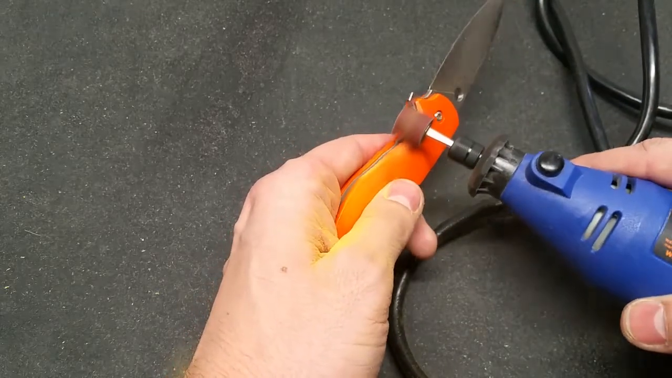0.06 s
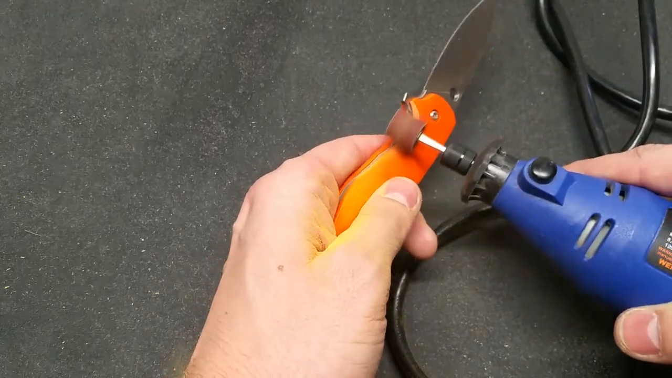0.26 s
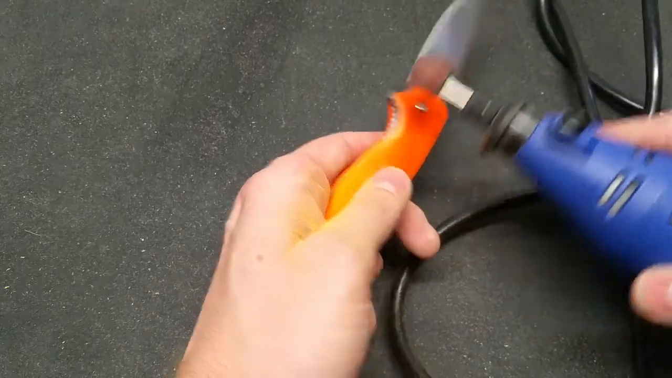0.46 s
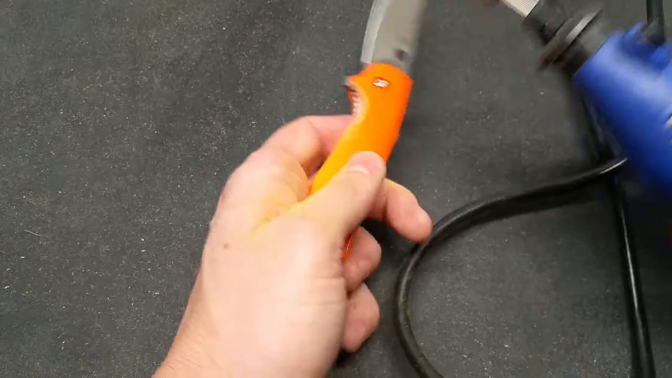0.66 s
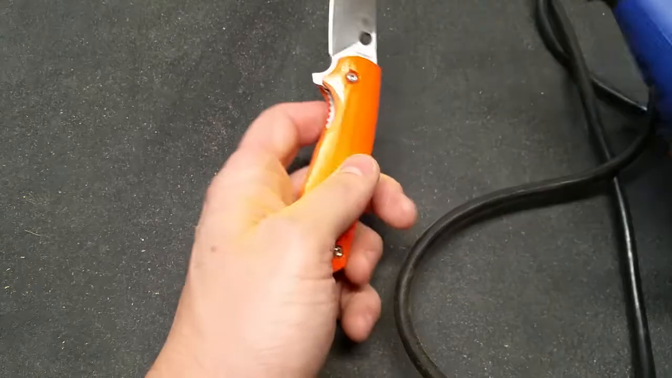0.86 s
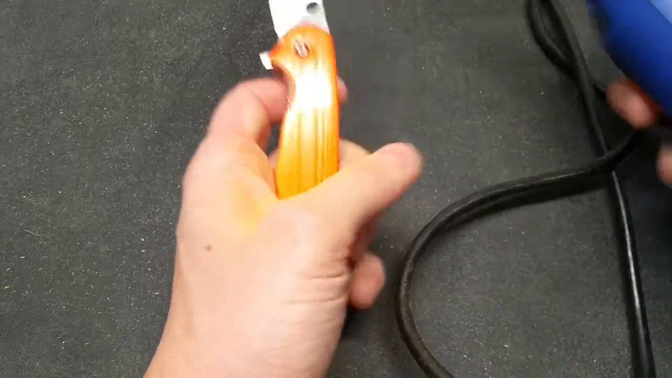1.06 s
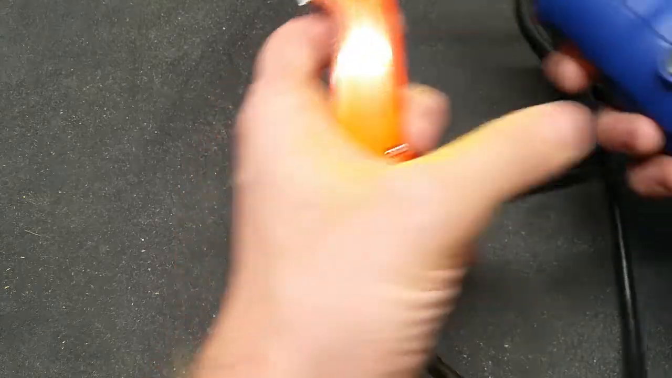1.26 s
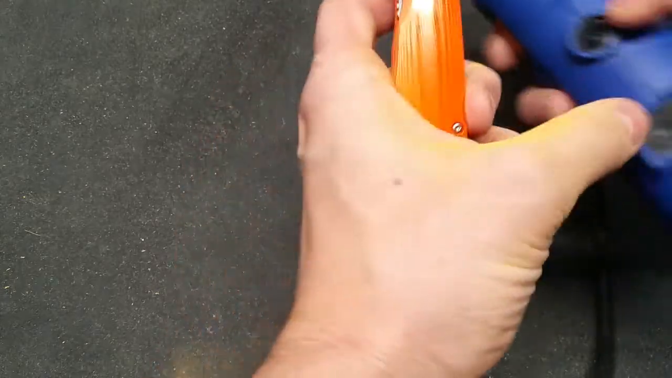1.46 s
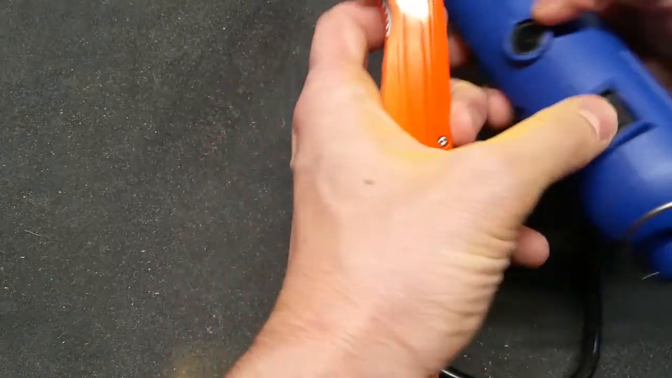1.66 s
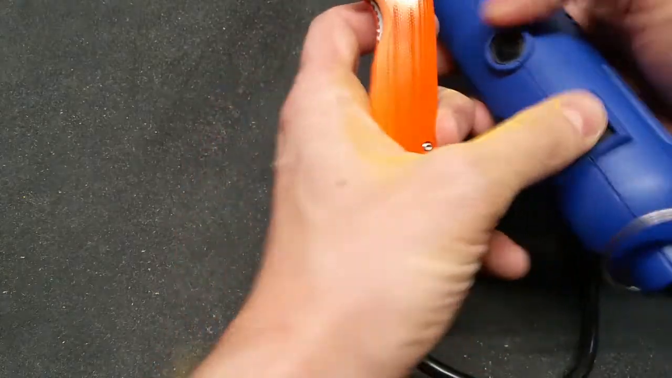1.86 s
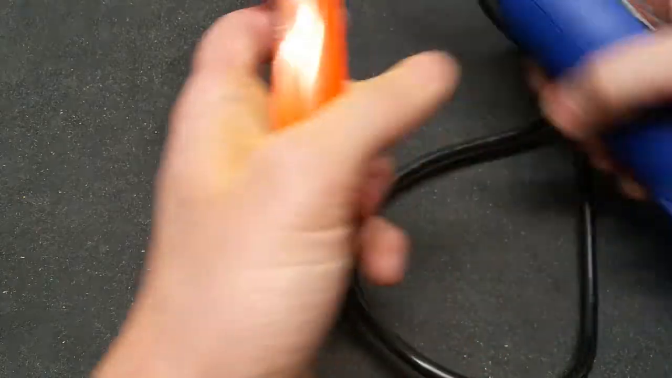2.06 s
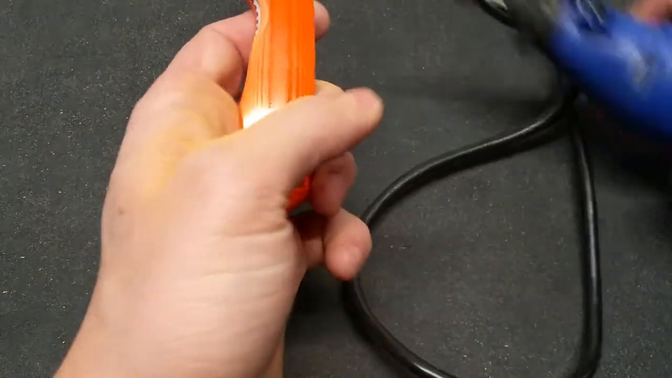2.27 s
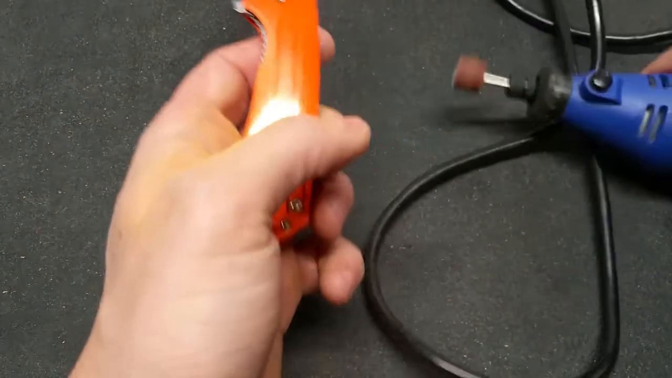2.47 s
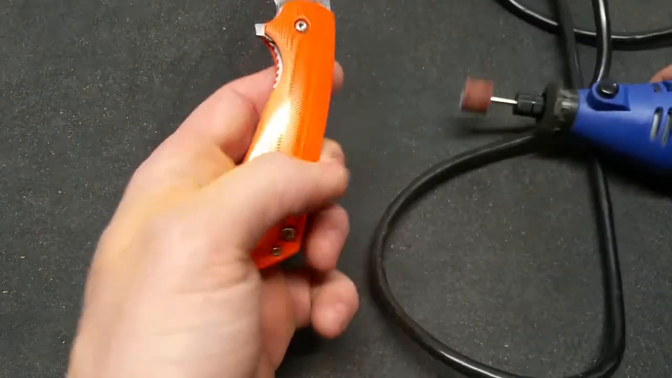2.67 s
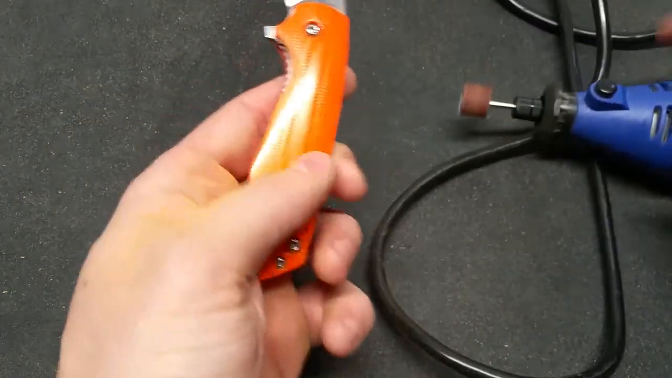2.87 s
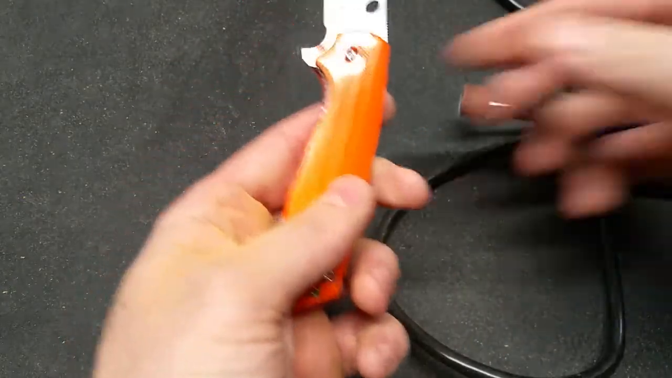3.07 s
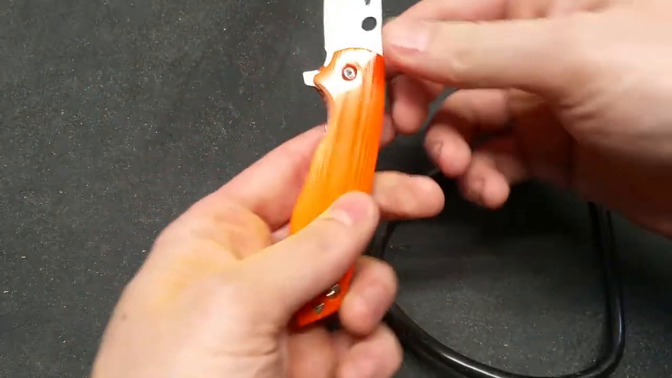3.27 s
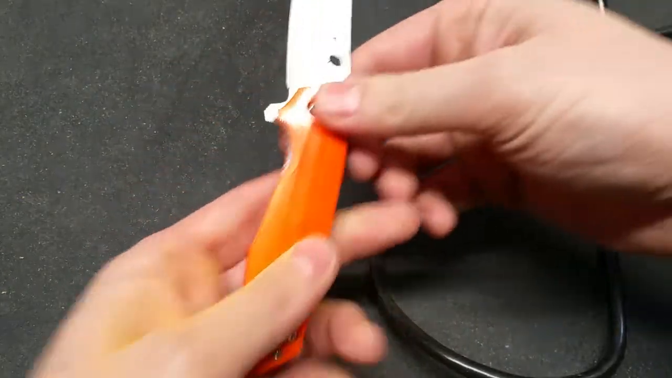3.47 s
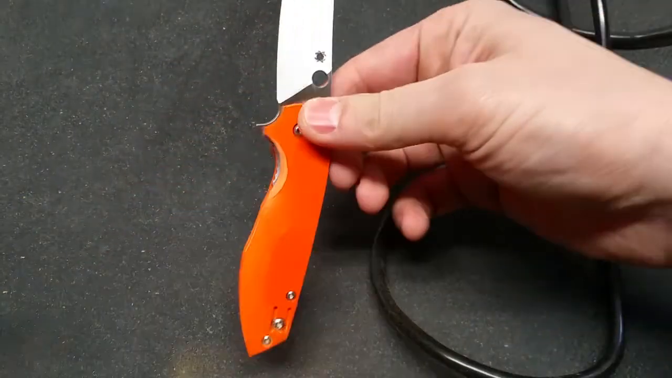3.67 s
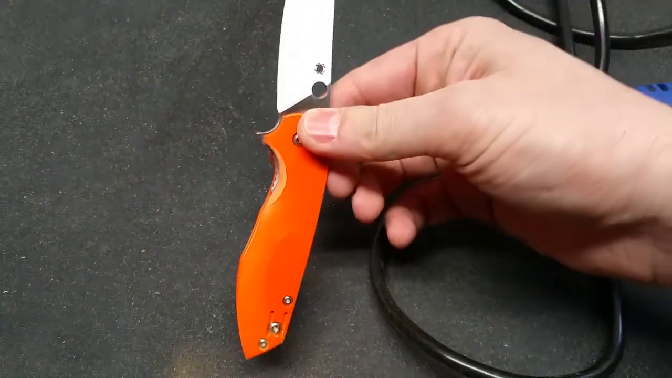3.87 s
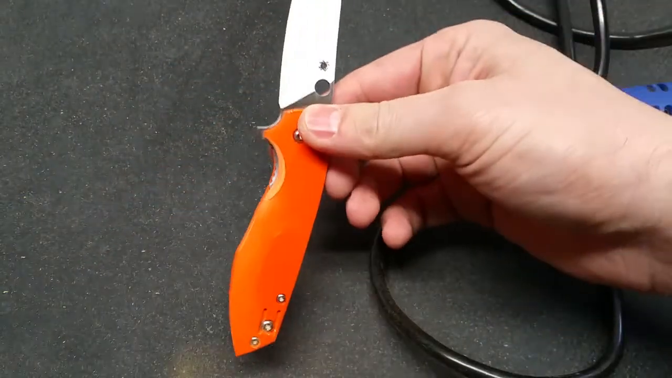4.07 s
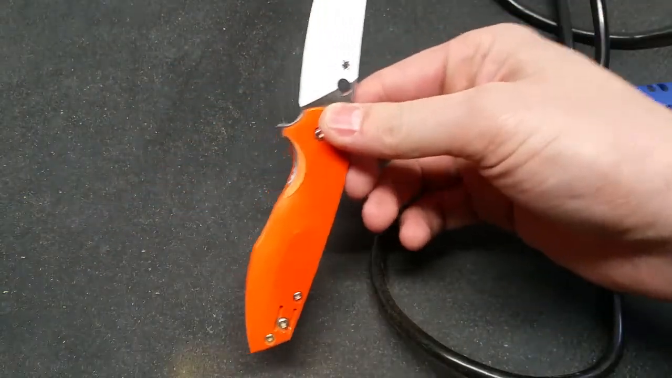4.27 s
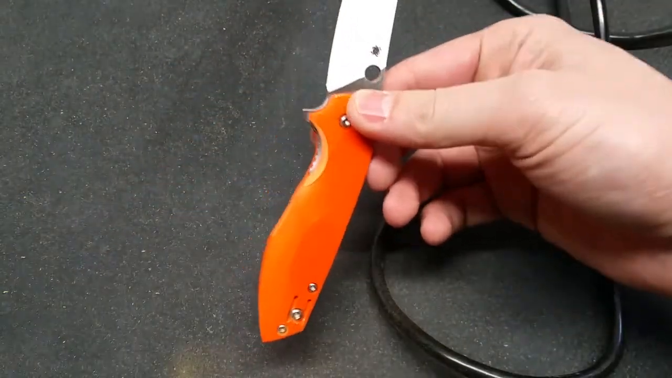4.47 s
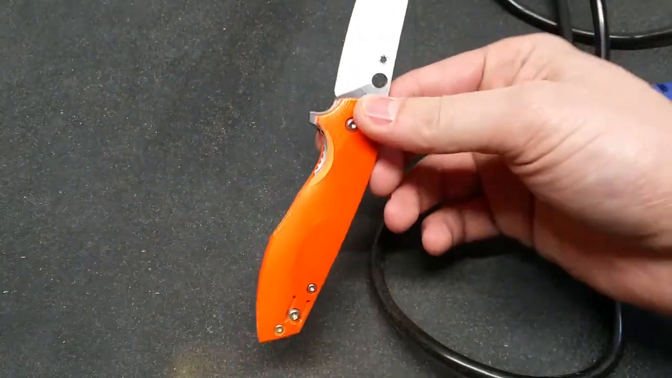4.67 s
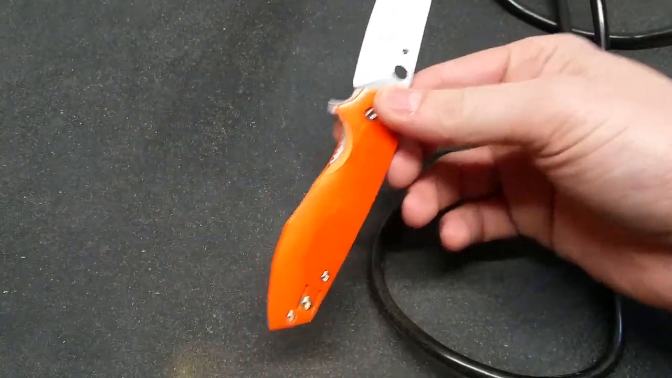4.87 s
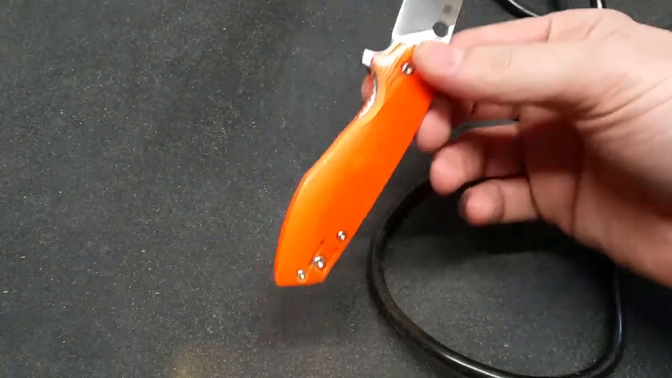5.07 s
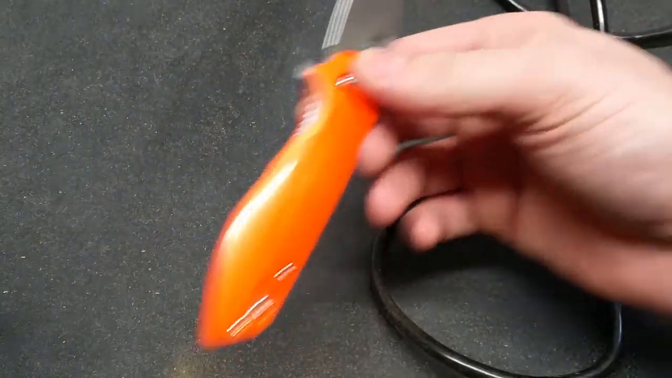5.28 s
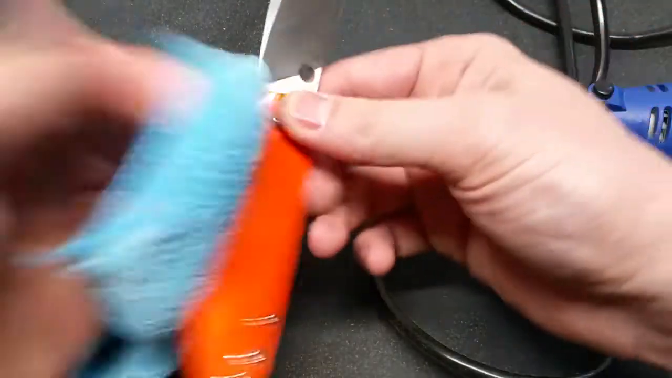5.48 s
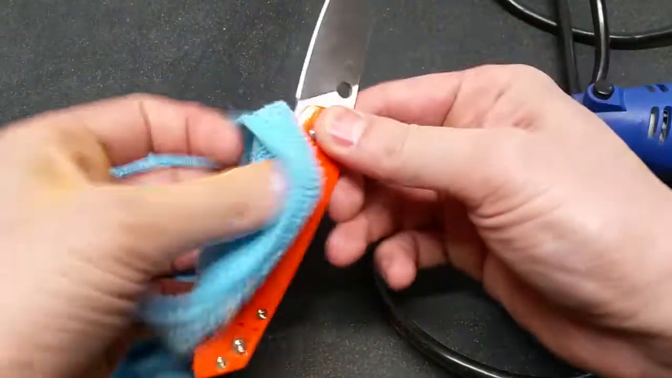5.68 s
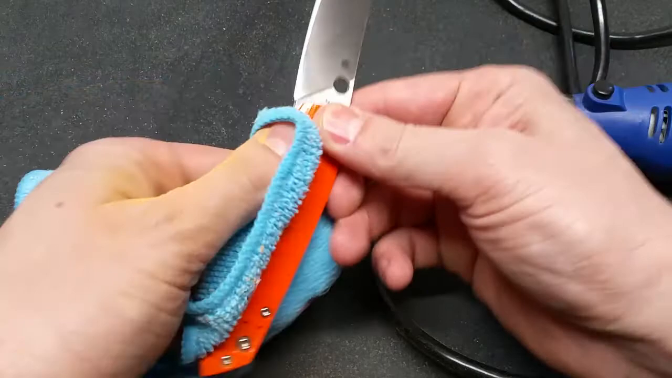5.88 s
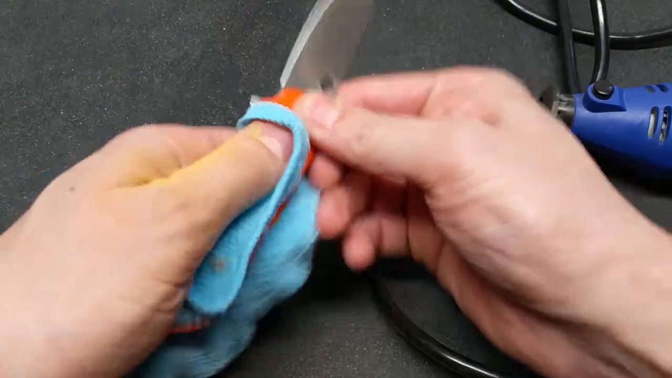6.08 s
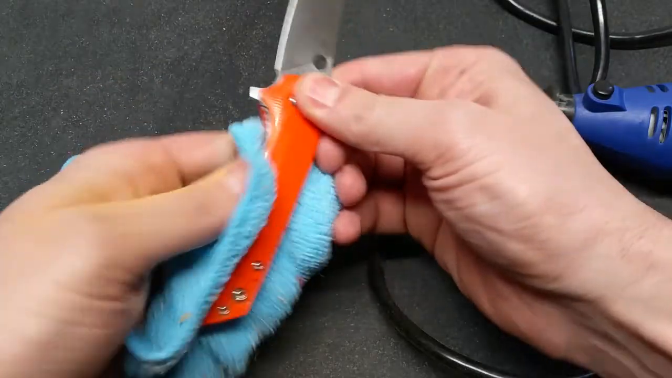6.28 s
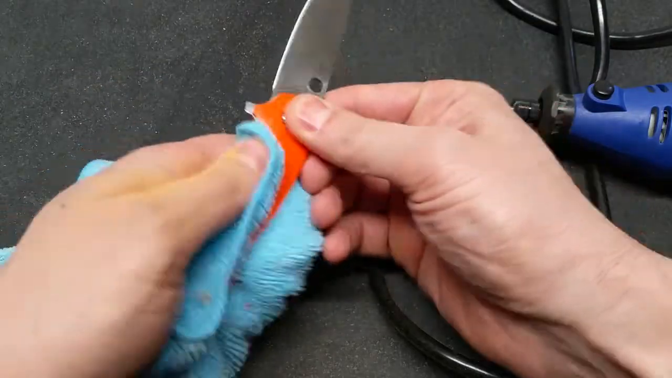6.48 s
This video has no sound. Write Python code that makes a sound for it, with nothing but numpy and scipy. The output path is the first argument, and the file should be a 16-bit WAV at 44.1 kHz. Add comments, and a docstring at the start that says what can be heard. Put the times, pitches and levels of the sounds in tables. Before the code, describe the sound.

A handheld rotary tool whines loudly, snaps off and glides down in pitch to a rattling stop, then a cloth softly rubs a handle.

```python
"""A handheld rotary tool whines and hisses, is switched off with a snap and glides down in pitch to a stop
on a padded bench; afterwards a cloth wipes a knife handle in a quiet room.
The unbalanced rotor sings its turning rate; commutator, brushes and bearings add multiples of it.
Shaped noise makes the rush of air, the cloth and the room; short pushes set off ringing snaps and thuds.
A two-port microphone hears it in stereo, the left port a little later than the right."""
import sys
import numpy as np
from scipy import signal
from scipy.fft import rfft, irfft
from scipy.io import wavfile
from scipy.ndimage import uniform_filter1d

SR = 44100
rng = np.random.default_rng(int(sys.argv[2]) if len(sys.argv) > 2 else 0)


def transcribe(signal):
    """Save signal, clipped to [-1, 1], as a 16-bit WAV file at the path in sys.argv[1]."""
    frames = np.atleast_2d(signal).T
    limited = np.clip(frames, -1, 1)
    pcm = np.round(limited * 32767).astype(np.int16)
    wavfile.write(sys.argv[1], SR, pcm)


N = 288414
T = np.arange(N) / SR   # time of every sample [s]

MAINS_HZ, PORT_LAG_S = 60, 0.00021
SWITCH_OFF_S, SWITCH_SETTLED_S = 1.747, 1.768
LAID_DOWN_S, BENCH_CONTACT_S = 2.5, 0.0045   # start of the bench contact, and how long it takes to close
POSE_WANDER_DB, POSE_WANDER_HZ = 1.3, 5      # slow unsteadiness of level in the hand

# rotor speed under power, loaded at first: (time [s], speed [turns per s])
SPEED = [(0, 438), (.4, 438.2), (.52, 441), (.8, 443), (.95, 443), (1.1, 442), (1.43, 442.3), (1.747, 441)]
# how much of the left-right level step reaches each pitch: (pitch [Hz], share [0-1])
PAN_SHARE = [(300, 0.24), (700, 0.28), (1400, 0.4), (2800, 1), (5600, 0.54), (10000, 0.62), (14000, 0.36)]
# the left port hears the coasting tool by another path: (pitch [Hz], gain [dB])
LEFT_PATH = [(400, 3.5), (700, 2.5), (1000, 2.5), (1400, 0), (2200, -3.5), (2800, 1.5), (3200, -1),
             (3500, -9.5), (3850, -0.5), (4400, 1), (6000, -5.5), (9000, -1)]


def from_db(db):
    """Turn decibels into a gain."""
    return 10 ** (np.asarray(db) / 20)


def rms_one(x):
    """Scale a sound so that its average strength (rms) is 1."""
    return x / np.sqrt(np.mean(x ** 2) + 1e-20)


def in_time(rows):
    """Join each column of a table by straight lines in time."""
    s, *columns = np.transpose(rows)
    return [np.interp(T, s, column) for column in columns]


def at_hz(points, hz):
    """Read a spectrum at a pitch, on a logarithmic pitch axis."""
    table_hz, values = np.array(points)[:, 0], np.array(points)[:, 1]
    return np.interp(np.log(hz), np.log(table_hz), values)


def drift(rate, size=N):
    """Slow random wandering with spread 1: noise smoothed below rate [Hz]."""
    step = 40   # computed at every 40th sample, then joined by lines
    r = np.exp(-2 * np.pi * step * rate / SR)
    noise = rng.standard_normal(N // step + 2002)
    slow = signal.lfilter([1], [1, -2 * r, r * r], noise)[2000:]
    return np.interp(np.arange(size) / step, np.arange(len(slow)), rms_one(slow))


def bell(s, length):
    """A smooth rise and fall around the time s."""
    return np.exp(-.5 * ((T - s) / (length / 2)) ** 2)


def ring(x, hz, t60):
    """A resonator: a unit click rings as a sine that starts near height 1 and falls 60 dB in t60 seconds."""
    r, w = from_db(-60 / (t60 * SR)), 2 * np.pi * hz / SR
    return signal.lfilter([0, np.sin(w)], [1, -2 * r * np.cos(w), r * r], x + 1e-18)


def peak(x, hz, width):
    """A resonance with gain 1 at its top."""
    r = np.exp(-np.pi * width / SR)
    top = (1 - r * r) / 2 * np.array([1, 0, -1])
    return signal.lfilter(top, [1, -2 * r * np.cos(2 * np.pi * hz / SR), r * r], x)


def coloured(x, spectrum):
    """Filter a sound by a spectrum in dB."""
    hz = np.maximum(np.fft.rfftfreq(N, 1 / SR), 1)
    return irfft(rfft(x) * from_db(at_hz(spectrum, hz)), N)


def bands(spectrum, likeness, patchy_db, tilt):
    """Stereo noise in narrow bands, each with its level, flicker and left-right likeness; tilt(hz) adds dB."""
    out, edges = 0, 22 * 2 ** np.arange(0, 9.7, .4)
    white = rng.standard_normal((2, 2, N))
    for k, (low, high) in enumerate(zip(edges, edges[1:])):
        band = signal.butter(2, [low, high], "band", fs=SR, output="sos")
        mid, side = signal.sosfilt(band, white[k % 2])   # neighbouring bands use different noise
        hz = np.sqrt(low * high)
        alike = np.clip(likeness(hz), -1, 1)
        pair = np.sqrt(1 + alike) * mid + np.sqrt(1 - alike) * side * [[1], [-1]]
        level_db = at_hz(spectrum, hz) + patchy_db * drift(19.0) + tilt(hz)
        out = out + from_db(level_db) * pair
    return out


def late(x):
    """The left port hears the tool later than the right."""
    return np.interp(T - PORT_LAG_S, T, x)


def two_ports(x, pan_db):
    """One sound at both ports, later at the left; pan_db is left minus right."""
    return np.array([late(x) * from_db(pan_db / 2), x * from_db(-pan_db / 2)])


def apart(pair, pan_db):
    """A coasting sound at both ports, the left one later and coloured by its path."""
    left = late(coloured(pair[0], LEFT_PATH))
    return np.array([left * from_db(pan_db / 2), pair[1] * from_db(-pan_db / 2)])


def in_pose(levels_db):
    """The hand moves the tool through six poses; a level glides from one pose to the next."""
    # changes between: at the knife, lifted, drawn back, held aside, turned, gripped at the switch
    # (middle of the change [s], length [s])
    pose_changes = [(0.438, 0.13), (0.738, 0.11), (0.99, 0.066), (1.383, .064), (1.57, 0.089)]
    s = [edge for mid, length in pose_changes for edge in (mid - length / 2, mid + length / 2)]
    return np.interp(T, s, np.repeat(levels_db, 2)[1:-1])


def shell(x):
    """Once the tool lies on the bench its shell resonances stand out."""
    # resonances of the shell: (pitch [Hz], width [Hz], gain [dB] before the fade-in)
    shell_modes = [(666, 250, 8), (825, 56, 2.5), (2160, 170, 6.5), (2730, 640, 11.5), (3740, 960, 2),
                   (4780, 100, 3), (5480, 230, 7), (6560, 220, -7.5)]
    rings = sum(from_db(level_db) * peak(x, hz, width) for hz, width, level_db in shell_modes)
    lying = np.clip((T - LAID_DOWN_S) / .3, .2, 1)   # a fifth of it is there from the start
    return (1 - .5 * lying) * x + lying * rings


def thin_out(x):
    """Narrow dips at a few fixed pitches thin the hiss and whine."""
    # (pitch [Hz], width [Hz], share removed [0-1])
    narrow_dips = [(1400, 300, 0), (1854, 100, .5), (2540, 170, 0.7), (3000, 95, 0.4), (3390, 250, 0.2)]
    for hz, width, share in narrow_dips:
        x = x - np.clip(share, 0, 1) * peak(x, hz, width)
    return x


def rotor_speed():
    """Turns per second: held under power, then slowed by steady friction and fan drag growing with speed squared."""
    balance_hz, drag_per_s = 404.5, .29103   # speed where drag equals friction, and their strength
    field_brake_hz, field_dies_s = 8.5, .0628   # brief extra braking as the field dies
    powered, off = in_time(SPEED)[0], np.maximum(T - SWITCH_OFF_S, 0)
    start = np.arctan((SPEED[-1][1] - field_brake_hz) / balance_hz)
    coasting = balance_hz * np.tan(start - drag_per_s * off) + field_brake_hz * np.exp(-off / field_dies_s)
    return uniform_filter1d(np.where(off > 0, np.maximum(coasting, 1), powered), size=400)


def bench_gain(hz):
    """How strongly bench and room pass a slowly gliding tone: resonances add, cancelled pitches dip."""
    # resonances of bench and room under the tool: (pitch [Hz], width [Hz], gain [dB])
    bench_modes = [(110, 2.4, 3), (122.6, 22, 8), (179, 23, 3.5), (227.5, 23, -1.5), (279, 3.4, -24),
                   (390, 55, -9), (600, 300, -11), (955, 32, 17.5)]
    # pitches where direct and reflected sound cancel: (pitch [Hz], width [Hz])
    bench_nulls = [(90, 11), (114, 2.2), (158, 3.3), (263, 7.5), (335, 45), (480, 22)]
    total = 0
    for mode, width, level_db in bench_modes:
        damping = 1j * hz * width
        total = total + from_db(level_db) * damping / (mode ** 2 - hz ** 2 + damping)
    dips = [1 - 0.66 * np.exp(-((hz - null) / width) ** 2) for null, width in bench_nulls]
    return np.abs(total) * np.prod(dips, axis=0)


def unbalance(turns_hz, angle):
    """The uneven rotor shakes once a turn; without power two multiples join, in the hand, then via the bench."""
    # unbalance tone in the hand: (time [s], level [dB])
    in_hand = [(0, -13), (.14, -11.5), (.7, -13), (.84, -17), (1.3, -16), (1.74, -15.5), (1.81, -16),
               (1.89, -20.5), (2.11, -25), (2.28, -28), (2.33, -32), (2.37, -25.5), (2.42, -31.5),
               (2.44, -24.5), (2.5, -26)]
    # in the hand without power: (multiple, level against the unbalance tone [dB])
    free_multiples = [(2, -17.5), (3, -14)]
    # on the bench, before its resonances:
    # (multiple, level at 200 turns per s [dB], rise per octave of speed [dB])
    on_bench = [(1, -33.5, 14), (2, -39, 8.5), (3, -37.5, 12.5)]
    off = np.clip((T - SWITCH_OFF_S) / 0.0021, 0, 1)
    lying = np.clip((T - LAID_DOWN_S) / BENCH_CONTACT_S, 0, 1)
    first = from_db(in_time(in_hand)[0])
    held = [first]
    for _, free_db in free_multiples:
        held.append(off * first * from_db(free_db + POSE_WANDER_DB * drift(POSE_WANDER_HZ)))
    low = 0
    for k, (hand, (_, level_db, octave_db)) in enumerate(zip(held, on_bench), start=1):
        bench = from_db(level_db + octave_db * np.log2(turns_hz / 200)) * bench_gain(k * turns_hz)
        low = low + ((1 - lying) * hand + lying * bench) * np.sin(k * angle)
    return np.sqrt(2) * low


def ripple_tone(angle):
    """While powered, mains ripple adds one strong side tone at twice the mains rate above the turning rate."""
    # level [dB], one column for each pose
    tone_db = (-36.5, -35, -38, -33, -30, -30)
    # left minus right [dB], one column for each pose
    tone_pan_db = (-1, -4.5, -10, -8.5, -0.5, -1)
    on = np.clip((SWITCH_OFF_S - T) / 0.0021, 0, 1)
    tone = np.sin(angle + 4 * np.pi * MAINS_HZ * T)
    return two_ports(np.sqrt(2) * on * from_db(in_pose(tone_db)) * tone, in_pose(tone_pan_db))


def powered_whine(angle, pan_db):
    """Magnetic pull on the commutator slots gives multiples of the turning rate with mains-ripple side tones."""
    # strong multiples, before the common lift below:
    # (multiple, level in each of six poses [dB], left minus right in each of six poses [dB])
    slot_rows = [(2, -40, -37.5, -44.5, -50.5, -46.5, -49.5, -6, -5, -8, 0, 10, 12),
                 (3, -36.5, -35.5, -41.5, -39.5, -35.5, -39.5, -7, -11, -10.5, 3, 8, 11),
                 (4.0, -42, -38, -41.5, -36.5, -47.0, -37.5, -15, -5.5, 2, 4.0, 21, -2.5),
                 (5.0, -28.5, -30, -30, -30.5, -37.5, -34, -5, -2.5, -1.5, -2.5, -6.5, -4.5),
                 (6.0, -38.5, -38.5, -38.5, -31, -38, -42, -10.5, -13.5, -9, -2, -7.5, -17),
                 (7.0, -35.5, -36.5, -36.5, -41, -44, -35.5, 3.5, 9.5, -5.5, 2.5, -7.5, -7),
                 (8.0, -23.5, -26.5, -34.5, -34.0, -30.5, -44.5, 1.0, 0.0, -17.5, -6, -4.5, -9),
                 (9.0, -36.5, -35.5, -27.5, -25.5, -33, -31.5, -8, -5.5, -7, -4, -9, -8.5),
                 (10.0, -31, -39, -41, -41.5, -38.5, -39, -3.0, -6.5, -12.5, -10, -8.5, -1.5),
                 (11.0, -38, -38.5, -45, -45.5, -35.5, -37, -5.5, 1.5, -10.0, -8.5, -8, 3.0),
                 (12.0, -44.5, -44.5, -49.0, -46, -44.5, -43.5, -0.5, -0.5, -6, -9.5, -8.5, -10),
                 (13.0, -49.5, -42.5, -40.0, -40, -42.5, -45, -3.5, -8.5, -11.5, -8.5, -3.5, 0),
                 (14.0, -42, -38, -40.5, -39, -44, -38.0, -15.5, -13.5, -14.5, -12.5, -6.5, -6.5),
                 (15.0, -46, -40, -39.5, -42.5, -43.5, -46, -4.5, -17, -21.5, -14, -19.5, -14),
                 (16.0, -41.5, -38.5, -43.5, -35.5, -39, -45, -14.5, -17.5, -3.5, -12, -13.5, -6.5),
                 (17.0, -35, -40.5, -36.5, -36.5, -44, -38, -12.0, -15, -4.5, -11.5, -13.5, -12),
                 (18.0, -45, -45, -34.5, -40, -40.5, -47.0, 6.5, -7.5, -6.5, 0.5, -8.5, 2),
                 (19.0, -43.5, -38, -41, -37.5, -50, -50, -7.5, -10.0, -6.5, -2.5, -8.5, -2.5)]
    # remaining multiples, before the changes below: (multiple, level [dB])
    other_multiples = [(20, -32), (22, -30), (25, -34), (30, -38), (35, -41)]
    # side tones of the strongest multiples, against the multiple:
    # (multiple, lower side tone in each of six poses [dB], upper side tone in each of six poses [dB])
    side_rows = [(7.0, -12, -15.5, -8, -16, -10.5, -14.5, -12, -3.0, 0.5, -6.5, -6, -11.0),
                 (8.0, -20, -9.5, -6, -8.5, -4.5, 3.5, -14, -14.5, -2, -7, -7.5, -2),
                 (9.0, -12, -9, -11, -13, -8.0, -19, -7, -5.5, -12.5, -14.5, -13, -12.5),
                 (10.0, -18.5, -1.0, 2.5, -2.5, -8.5, -3.5, -19.5, -5, -9, -5, -5, -10.5),
                 (11.0, -11.5, -3, -3, 5, -4.5, -13.5, -16, -8.0, -9.5, -7.5, -14.5, -6)]
    path_wander_rad, path_wander_db = .05, 1   # each port's path shifts as the hand moves; radians per multiple
    size = round(SWITCH_OFF_S * SR)
    ripple = 4 * np.pi * MAINS_HZ * T[:size]
    turn = np.array([late(angle), angle])[:, :size]
    slots = {round(row[0]): (in_pose(row[1:7])[:size], in_pose(row[7:])[:size]) for row in slot_rows}
    sides = {round(row[0]): [in_pose(row[1:7])[:size], in_pose(row[7:])[:size]] for row in side_rows}
    out = np.zeros((2, N))
    for k in range(2, 36):
        if k in slots:
            level_db, lean_db = slots[k]
        else:
            level_db = at_hz(other_multiples, k) - 14
            lean_db = at_hz(PAN_SHARE, k * SPEED[0][1]) * pan_db[:size]
        level_db = level_db + POSE_WANDER_DB * drift(POSE_WANDER_HZ, size=size)
        lean = np.outer([1, -1], drift(2.2, size=size))   # the hand turns the tool a little
        turned = path_wander_rad * k * lean + rng.uniform(0, path_wander_rad * k)
        start, low_start, high_start = rng.uniform(0, 2 * np.pi, size=3)
        phase = k * turn + start + .005 * k * drift(12, size=size) + turned
        # other side tones: weaker on low multiples, stronger on high ones
        usual_db = 20 * np.log10(min(k / 9, 1) ** 2 * max(k / 14, 1)) + np.array([[-9], [-13]])
        side_wander = np.array([drift(3.5, size=size), drift(0.99, size=size)])
        below, above = from_db(sides.get(k, usual_db) + 0.75 * side_wander)
        line = np.sin(phase)
        line = line + below * np.sin(phase - ripple + low_start + 0.44 * lean)
        line = line + above * np.sin(phase + ripple + high_start - 1.4 * lean)
        port_db = path_wander_db * lean + np.outer([.5, -.5], lean_db)
        out[:, :size] += from_db(level_db + port_db) * line
    return out * from_db(7.5)


def colour_db(hz, bright_db, body_db):
    """How the tool's treble and low body shift as it is turned and slows."""
    treble = (bright_db + 17.5) * np.clip(np.log2(hz / 5000), 0, 1)
    return treble + body_db * np.clip(np.log2(4500 / hz), 0, 1)


def air_rush(angle, rush_db, bright_db, body_db, pan_db):
    """Fan and bearings make turbulent noise that throbs once a turn."""
    # colour of the rush: (pitch [Hz], relative level per Hz [dB])
    rush_colour = [(100, -47.5), (200, -27), (400, -13.5), (600, -23), (900, -9.5), (1400, -5.5),
                   (2100, -6), (3000, -13.5), (4200, -5), (5700, -12.5), (7300, -0.5), (8200, -15.5),
                   (12000, -19.5), (15900, -30)]
    # (pitch [Hz], left-right likeness [0-1])
    rush_likeness = [(60, 0.16), (180, 1), (550, 1), (1650, 0.29), (4970, 0.27), (15000, 0.059)]

    def tilt(hz):
        lean_db = at_hz(PAN_SHARE, hz) * np.outer([.5, -.5], pan_db)
        return colour_db(hz, bright_db, body_db) + lean_db

    left, right = bands(rush_colour, lambda hz: at_hz(rush_likeness, hz), 1.6, tilt)
    coasting = np.clip((T - SWITCH_OFF_S) / 0.31, 0, 1)
    left = left + coasting * (coloured(left, LEFT_PATH) - left)
    noise = np.array([late(left), right])
    noise = thin_out(.5 * (noise + shell(noise)))   # half of the rush bypasses the shell
    return from_db(rush_db - 3) * rms_one(noise) * (1 + .18 * np.sin(angle))


def room_tone():
    """Steady room noise with a few wavering hum lines of the building, made by noise-fed resonators."""
    # colour of the room: (pitch [Hz], relative level per Hz [dB])
    room_colour = [(20, -10.5), (60, -17.5), (110, -13), (200, -11), (300, -16.5), (600, -22),
                   (1000, -29.5), (2200, -27), (3000, -29.5), (5500, -28.5), (7200, -41), (15800, -33)]
    # wavering hum, before the swell: (pitch [Hz], level [dB], width [Hz])
    hum_lines = [(106.6, -71, 1), (122, -80, 6.2), (213, -69, 4), (284, -71, 6.9)]
    # swell of the hum lines below 150 Hz: (time [s], added level [dB])
    hum_swell = [(0, 11), (1.0, 4.5), (1.5, 11.5), (2.3, 21.5), (3.0, 16), (3.6, 12), (4.5, 8), (5.6, 4),
                 (5.75, 1), (6.54, 5.5)]
    noise = rms_one(bands(room_colour, lambda hz: 1 - 0.21 * np.log2(hz / 40), 1.2, lambda hz: 0))
    swell_db, = in_time(hum_swell)
    hum = 0
    for hz, level_db, width in hum_lines:
        line = rms_one(ring(rng.standard_normal(N), hz, 2.2 / width))
        hum = hum + from_db(level_db + swell_db * (hz < 150)) * line
    return from_db(-61.5) * noise + hum


def knocks():
    """Snaps ring the plastic shell or the knife; handling gives short dull thuds."""
    # switch snaps and cloth ticks: (time [s], relative peak [dB], 1 = on the knife)
    clicks = [(1.7474, -21, 0), (1.7487, -31, 0), (1.768, -29, 0), (5.991, -48, 1), (6.322, -39, 1)]
    # ringing of the shell at the switch: (pitch [Hz], relative level [dB], time to fall 60 dB [s])
    switch_rings = [(4430, 6.5, 0.012), (7170, 19.5, .006), (10000, 6, 0.0029), (1800, -15.5, .01)]
    # ringing of the knife: (pitch [Hz], relative level [dB], time to fall 60 dB [s])
    knife_rings = [(5400, -3.5, 0.004), (6000, -2, 0.0045), (7500, -14, .003), (11000, -15, .002)]
    # tool handled and laid down: (time [s], relative peak [dB], pitch [Hz])
    thuds = [(1.77, -53, 148), (2.13, -39, 194), (2.38, -25.5, 277), (2.51, -36, 222), (3.42, -46, 44.7),
             (3.95, -45, 49)]
    out = np.zeros(N)
    for s, peak_db, on_knife in clicks:
        for hz, level_db, t60 in (knife_rings if on_knife > .5 else switch_rings):
            hit = np.zeros(N)
            hit[round(s * SR) + rng.integers(0, 12)] = from_db(peak_db + level_db + 1.0)
            out += ring(hit, hz, t60)
    for s, peak_db, hz in thuds:
        push = from_db(peak_db - 30.0) * np.exp(-((T - s) / 0.014) ** 2) * rng.standard_normal(N)
        out += ring(push, hz, 28.0 / hz)
    return out


def coasting_whine(turns_hz, angle, rush_db):
    """Brushes and bearings repeat a pattern each turn; groups of multiples swell differently at each port."""
    # multiples while coasting: (multiple, relative level [dB])
    multiples = [(4, 3), (7, 1), (10, 0), (14, 1), (17, 2), (19, 0), (24, -1), (29, 3), (33, 2), (36, 0),
                 (40, -3), (48, -3), (65, -9), (100, -16)]
    # colour of the whine: (pitch [Hz], gain [dB])
    whine_colour = [(300, -19), (600, -16.5), (900, -10.5), (1400, -15.5), (2100, -5.5), (3000, -11),
                    (4200, -7.5), (5700, -4.5), (7300, 0.5), (8200, -21), (15900, -24)]
    swell_db, swell_hz = 2.8, 7
    out, circle = np.zeros((2, N)), np.linspace(0, 4 * np.pi, 8193)   # two turns
    groups = [np.arange(4 + k, 40, 9) for k in range(9)]
    groups += [np.arange(40, 66), np.arange(66, 101), np.arange(3.5, 8), np.arange(8.5, 14)]
    for group in groups:
        audible = np.clip(2.5 - group[-1] * turns_hz / 10000, 0, 1)   # very high groups are left out
        if group[0] % 1:   # lying on the bench the rotor also rattles every second turn
            audible = from_db(-4.5) * np.clip((T - LAID_DOWN_S) / BENCH_CONTACT_S, 0, 1)
        place = (angle + .004 * drift(10)) % (4 * np.pi)
        for port in range(2):
            heights = from_db(at_hz(multiples, group) + rng.normal(0, 1.5, len(group)))
            starts = rng.uniform(0, 2 * np.pi, (len(group), 1))
            pattern = heights @ np.sin(np.outer(group, circle) + starts)
            swell = from_db(swell_db * drift(swell_hz))
            out[port] += audible * swell * np.interp(place, circle, pattern)
    out = thin_out(shell(coloured(out, whine_colour)))
    even = out / np.sqrt(np.abs(uniform_filter1d(out ** 2, size=12000)) + 1e-9)   # level made steady
    slowing = np.clip((turns_hz - 30) / 90, 0, 1)   # the pattern falls apart near standstill
    # the air rush fades faster than the pattern
    level_db = rush_db - 6.5 + np.clip((300 - turns_hz) / 50, 0, 3)
    return even * slowing * from_db(level_db) * np.clip((T - SWITCH_OFF_S) / .004, 0, 1)


def swells(angle):
    """Single multiples sing out briefly as wavering, gliding tones, mostly on the right."""
    # (middle [s], length [s], multiple, level before wavering and left-right shares [dB])
    swell_rows = [(1.81, 0.06, 16, -42.0), (1.82, 0.09, 10, -44.0), (1.83, 0.12, 4, -38.0),
                  (1.83, 0.12, 9, -44.0), (1.85, 0.15, 5, -36.0), (1.87, 0.18, 12, -42.0),
                  (1.87, 0.18, 17, -47.0), (1.88, 0.21, 15, -41.0), (1.9, 0.24, 7, -39.0),
                  (1.96, 0.36, 14, -43.0), (1.97, 0.15, 19, -45.0), (2.0, 0.45, 11, -47.0),
                  (2.06, 0.03, 12, -45.0), (2.06, 0.09, 5, -46.0), (2.08, 0.12, 10, -47.0),
                  (2.12, 0.15, 16, -43.0), (2.15, 0.15, 18, -41.0), (2.15, 0.39, 8, -43.0),
                  (2.18, 0.15, 17, -39.0), (2.21, 0.09, 21, -48.0), (2.23, 0.12, 12, -46.0),
                  (2.3, 0.21, 4, -47.0), (2.33, 0.39, 19, -48.0), (2.38, 0.12, 18, -43.0),
                  (2.41, 0.18, 13, -46.0), (2.45, 0.3, 3, -46), (2.59, 0.12, 18, -46.0),
                  (2.6, 0.2, 21, -49), (2.63, 0.21, 8, -48.0), (2.7, 0.1, 9, -46), (2.74, 0.3, 17, -47.0),
                  (2.85, 0.3, 18, -50), (2.87, 0.2, 29, -48), (2.87, 0.21, 10, -46.0),
                  (2.95, 0.15, 27, -48), (3.0, 0.35, 2, -42), (3.02, 0.14, 11, -44), (3.05, 0.15, 30, -49),
                  (3.11, 0.27, 17, -47.0), (3.13, 0.12, 12, -48), (3.15, 0.2, 21, -50),
                  (3.15, 0.2, 31, -49), (3.16, 0.48, 4, -49.0), (3.19, 0.18, 5, -49.0),
                  (3.22, 0.12, 33, -47.0), (3.25, 0.1, 35, -48), (3.26, 0.1, 18, -47),
                  (3.26, 0.12, 13, -49), (3.3, 0.2, 6, -52), (3.3, 0.2, 14, -50), (3.38, 0.22, 29, -50),
                  (3.35, 0.25, 32, -51), (3.37, 0.36, 28, -50.0), (3.43, 0.36, 30, -50.0),
                  (3.45, 0.25, 5, -53), (3.5, 0.1, 16, -49), (3.5, 0.25, 31, -50), (3.56, 0.2, 34, -49),
                  (3.22, .15, 31, -49), (3.62, 0.21, 27, -54.0), (3.7, 0.2, 8, -54), (3.7, 0.25, 7, -56),
                  (3.42, .2, 27, -51), (3.6, .14, 33, -51), (4.0, .15, 40, -58), (3.2, .2, 28, -49),
                  (3.24, .16, 29, -49), (3.72, 0.12, 28, -53), (4.05, 0.15, 45, -58)]
    right_share = 0.67
    out = np.zeros((2, N))
    waver = from_db(2.5 * np.array([drift(18), drift(18)]) - 1)
    share = 2 * np.array([[1 - right_share], [right_share]])
    all_starts = rng.uniform(0, 2 * np.pi, (len(swell_rows), 2, 1))
    for (s, length, k, level_db), starts in zip(swell_rows, all_starts):
        begin, end = round(max(s - length, SWITCH_SETTLED_S) * SR), round((s + length) * SR)
        near = slice(begin, end)
        flat_top = np.exp(-((T[near] - s) / (.6 * length)) ** 4)
        height = np.sqrt(2) * from_db(level_db) * flat_top
        shift = 900 * round(k)   # each multiple reads another stretch of the waver
        tone = np.sin(round(k) * angle[near] + starts)
        out[:, near] += share * height * waver[:, begin + shift:end + shift] * tone
    return np.array([coloured(out[0], LEFT_PATH), out[1]])


def rattle(turns_hz, angle):
    """Loose bearings tick unevenly, loosely bunched once a turn, and ring their seats; the ports share some ticks."""
    # rattle as the rotor slows: (time [s], level [dB])
    rattle_level = [(2.5, -52), (2.9, -62), (3.3, -55), (3.65, -59), (3.8, -51), (3.9, -43), (4.1, -43),
                    (4.3, -49.5), (4.36, -50.5), (4.42, -55), (4.53, -69), (4.6, -79)]
    # what the rattle rings: (pitch [Hz], width [Hz], relative level [dB])
    bearing_modes = [(583, 108, 1), (850, 580, -11.5), (2190, 220, -4.5), (2880, 400, 6.5),
                     (3560, 420, -2.5), (3950, 440, 0), (5600, 1400, -10), (6950, 560, -4)]
    # one seat rings up briefly: (time at the peak [s], length [s], level [dB], pitch [Hz], width [Hz])
    seat_ring = (3, -0.07, -43, 2870, 160)
    likeness = 0.34   # share of tick power common to both ports
    rate = 13 * (turns_hz + 60) * (1 + .3 * np.sin(angle))   # ticks per second
    hits = rng.random((3, N)) < rate / SR
    heights = from_db(2.2 * np.minimum(rng.exponential(1, (3, N)), 4))
    both, *own = hits * heights * rng.choice([-1, 1], (3, N))
    ticks = np.sqrt(likeness) * both + np.sqrt(1 - likeness) * np.array(own)
    rings = 0
    for hz, width, level_db in bearing_modes:
        rings = rings + from_db(level_db) * peak(peak(ticks, hz, 2 * width), hz, 2 * width)
    even = rings / np.sqrt(uniform_filter1d(rings ** 2, size=16000) + 1e-12)   # level made steady
    s, length, seat_db, seat_hz, seat_width = seat_ring
    seat = rms_one(peak(peak(ticks, seat_hz, seat_width), seat_hz, seat_width))
    seat = from_db(seat_db) * bell(s, length) * seat
    return seat + from_db(in_time(rattle_level)[0]) * (T > LAID_DOWN_S) * even


def grips():
    """Fingers shift on the knife handle: a dull rustle of low noise under each move."""
    # (time at the peak [s], length [s], peak level [dB])
    shifts = [(4.655, 0.092, -72.5), (4.807, .04, -68), (5.022, 0.044, -64), (5.098, 0.027, -70),
              (5.46, 0.11, -73), (6.295, 0.12, -67.5), (6.476, 0.1, -67.5)]
    dull = signal.butter(2, [330, 820], "band", fs=SR, output="sos")
    noise = signal.sosfilt(dull, rng.standard_normal(N))
    return sum(from_db(peak_db) * bell(s, length) for s, length, peak_db in shifts) * rms_one(noise)


def cloth():
    """Fibres rub as dense fine grains under each bell-shaped stroke."""
    # strokes of fingers and cloth, before the flicker:
    # (time at the peak [s], length [s], peak level [dB], relative low share [dB])
    strokes = [(4.8, 0.04, -78, 15.5), (5.023, 0.056, -71.5, 8.5), (5.24, .04, -70, -3.5),
               (5.356, 0.089, -69, -5), (5.452, 0.029, -61, -17), (5.51, 0.045, -65, -3),
               (5.598, 0.036, -72, -14.5), (5.718, 0.067, -66, -11), (5.76, 0.028, -65.5, -16.5),
               (5.848, 0.076, -60, 9.5), (6.02, 0.069, -61.5, 13), (6.162, 0.047, -58, 1.5),
               (6.286, 0.052, -57.5, -16), (6.34, .03, -66, -8), (6.383, 0.046, -65.5, 12),
               (6.515, 0.06, -61, -2)]
    s, length, peak_db, low_db = np.transpose(strokes)[:, :, None]
    bells = from_db(peak_db) * bell(s, length) * from_db(1.5 * drift(45.0))
    grains = from_db(3.5 * np.minimum(rng.exponential(1, (2, N)), 5)) * rng.standard_normal((2, N))
    grains = grains + 0.041 * grains[::-1]   # a little of each side reaches the other
    fine = signal.sosfilt(signal.butter(1, [2800, 9000], "band", fs=SR, output="sos"), grains)
    # the weave scuffs most around 5300 Hz, coming and going
    fine = fine + from_db(-8 + 5.1 * drift(7.8)) * peak(fine, 5300, 1400)
    coarse = signal.sosfilt(signal.butter(2, [350, 2800], "band", fs=SR, output="sos"), grains)
    # from 5.4 s on the cloth never lies quite still
    rustle = from_db(-78 + 3.9 * drift(8.0)) * np.clip((T - 5.4) / .1, 0, 1)
    low_bells = (from_db(low_db - 9.5) * bells).sum(0)
    return (bells.sum(0) + rustle) * rms_one(fine) + low_bells * rms_one(coarse)


def scene():
    """Mix the tool, the handling, the cloth and the room."""
    # tool as heard: (time [s], air rush before later trims [dB], rush brightness, neutral at -17.5 [dB],
    # low body [dB], left minus right [dB])
    tool_course = [(0.0, -24, -25.5, 7.5, -5.5), (0.33, -17.5, -18, 1.5, 0), (0.64, -21, -10.5, 2, -9),
                   (0.97, -24, -0.5, 2, -9), (1.18, -23.5, -7.5, 1.5, -12), (1.41, -22.5, -11, 3.5, -10.5),
                   (1.67, -19.5, -20, 1, -8), (1.86, -22.5, -10.5, 3, -3), (2.24, -24.5, -10, 0.5, -3.5),
                   (2.7, -31, -9, 2.5, -2), (3.23, -33, -9, 1.5, -2), (3.83, -34, -17, -4, -3),
                   (4.28, -40.5, -20, -6, -6.5), (4.42, -53.5, -22, -1, -7), (4.52, -60.5, -21, 0, -6),
                   (4.6, -78, -17.5, -2, -4)]
    turns_hz = rotor_speed()
    rush_db, bright_db, body_db, pan_db = in_time(tool_course)
    angle = 2 * np.pi * np.cumsum(turns_hz) / SR
    stopped = np.clip((4.75 - T) / 0.13, 0, 1)   # fades to silence at 4.75 s
    # the level dips between the two snaps, most in the low tone
    between = (T > SWITCH_OFF_S + .002) & (T < SWITCH_SETTLED_S)
    dip = uniform_filter1d(1. * between, size=200)
    whole_dip_db, low_extra_dip_db = -2.1, -1.4
    low_tone = from_db(low_extra_dip_db * dip) * unbalance(turns_hz, angle)
    tool = two_ports(low_tone, 0.083 * pan_db) + ripple_tone(angle) + powered_whine(angle, pan_db)
    tool = tool + air_rush(angle, rush_db, bright_db, body_db, pan_db)
    coasting = coasting_whine(turns_hz, angle, rush_db) + rattle(turns_hz, angle)
    tool = tool + apart(coasting, 0.89 * pan_db) + swells(angle)
    tool = tool * from_db(whole_dip_db * dip) * stopped
    return tool + two_ports(knocks(), -1.5) + grips() + cloth() + room_tone()


def record(dry):
    """Peaks are rounded and everything above 15900 Hz is cut steeply."""
    rounded = .95 * np.tanh(dry / .95)
    return signal.sosfilt(signal.ellip(12, .3, 70, 15900, fs=SR, output="sos"), rounded)


dry = scene()
out = record(dry)
transcribe(out)
```